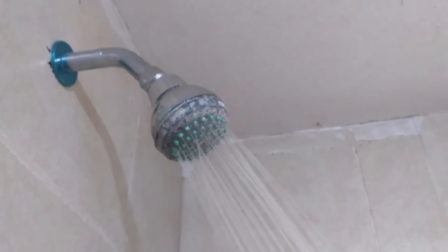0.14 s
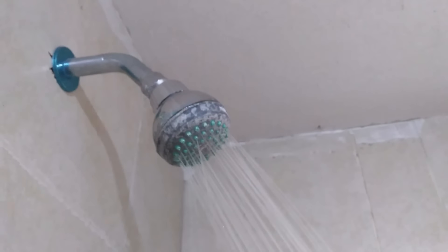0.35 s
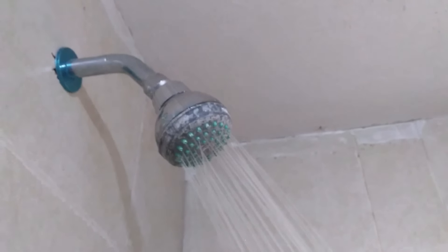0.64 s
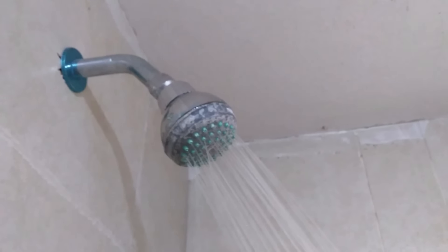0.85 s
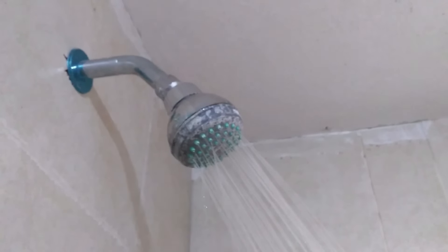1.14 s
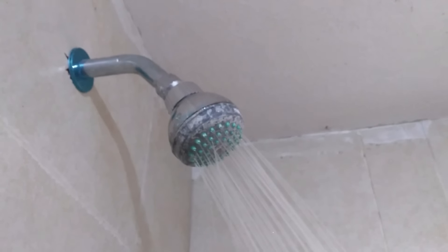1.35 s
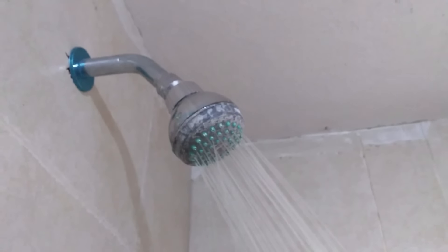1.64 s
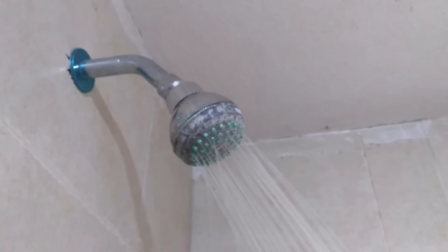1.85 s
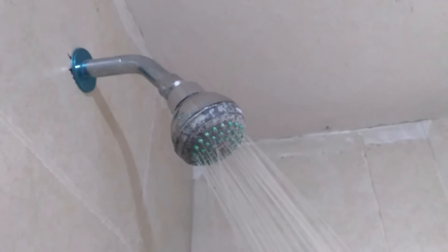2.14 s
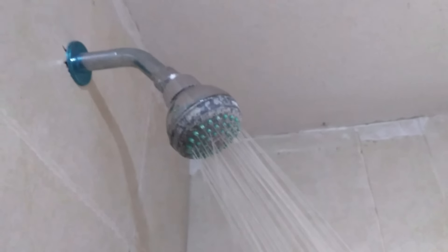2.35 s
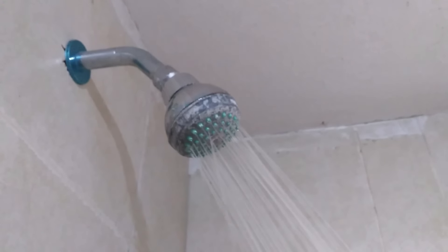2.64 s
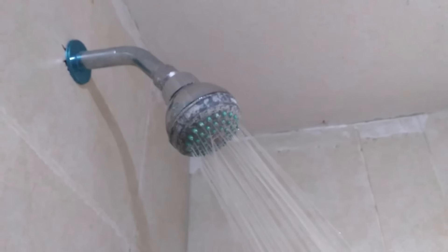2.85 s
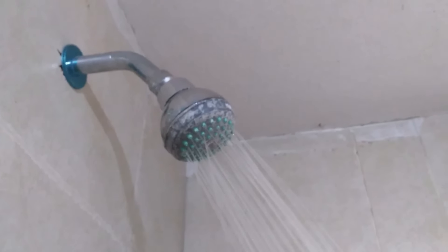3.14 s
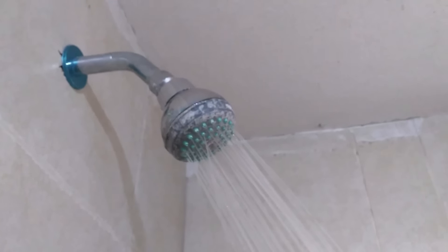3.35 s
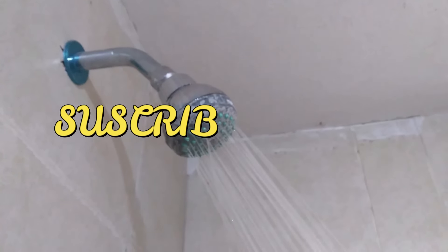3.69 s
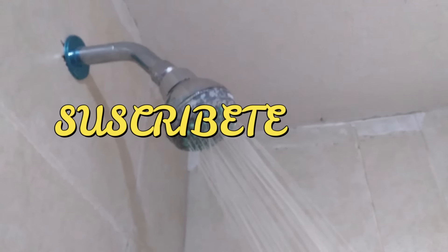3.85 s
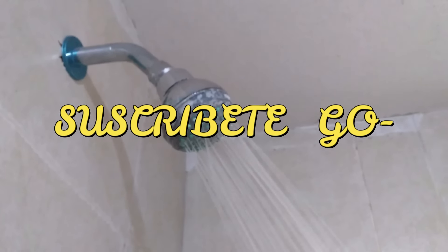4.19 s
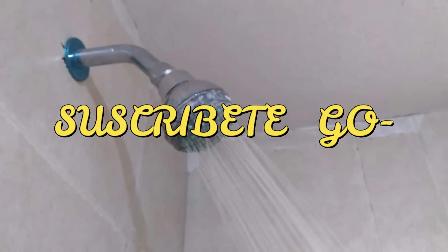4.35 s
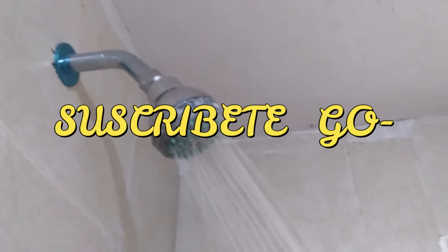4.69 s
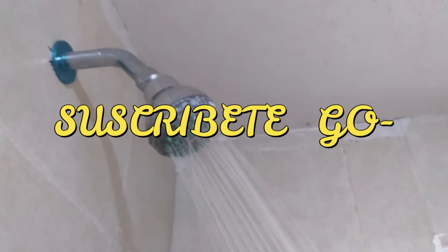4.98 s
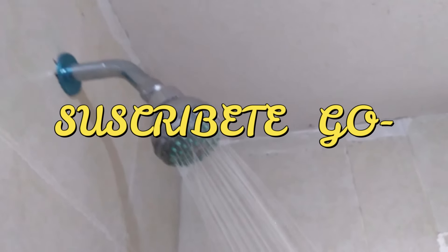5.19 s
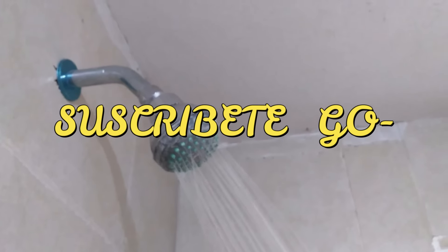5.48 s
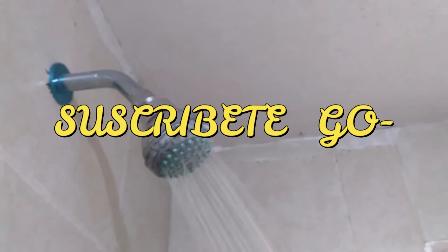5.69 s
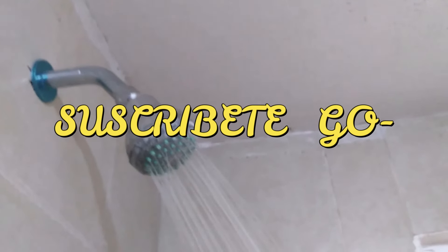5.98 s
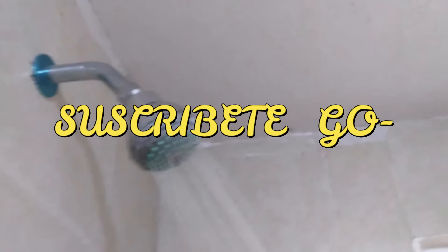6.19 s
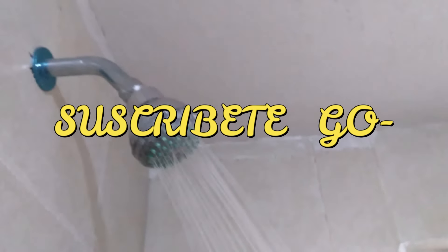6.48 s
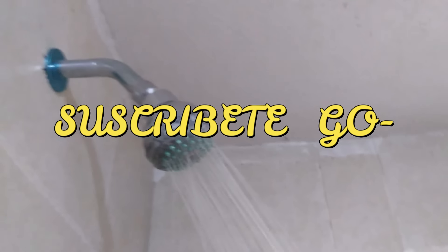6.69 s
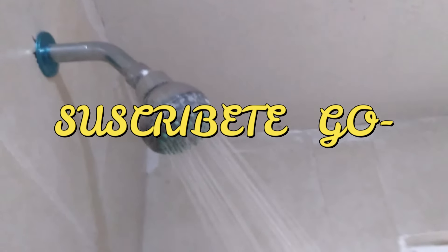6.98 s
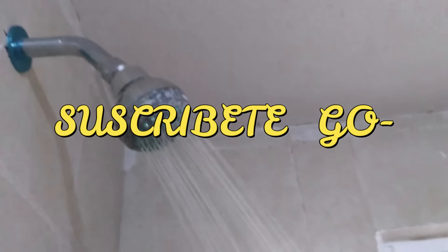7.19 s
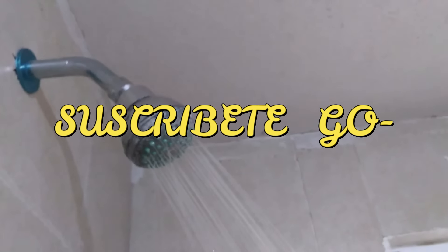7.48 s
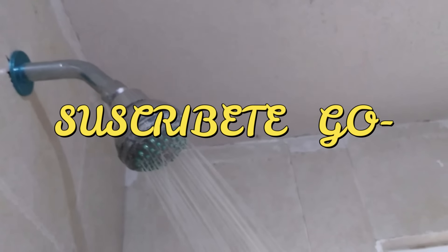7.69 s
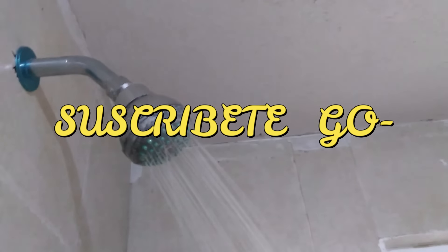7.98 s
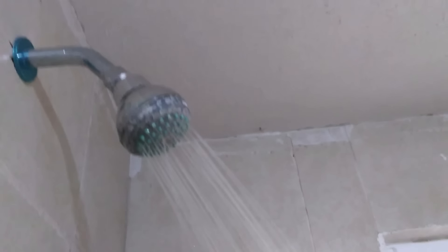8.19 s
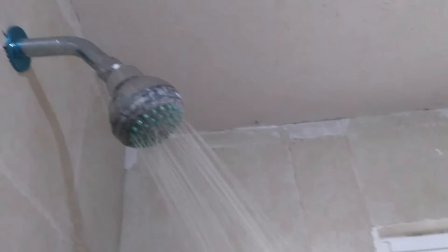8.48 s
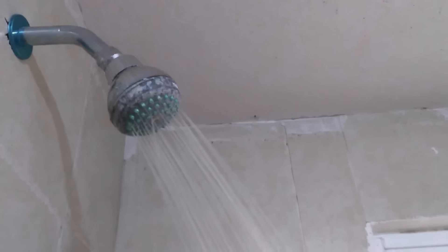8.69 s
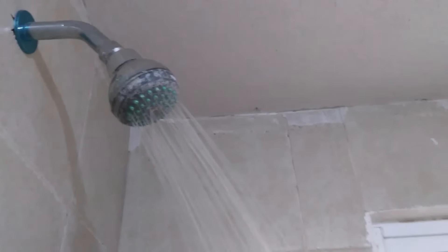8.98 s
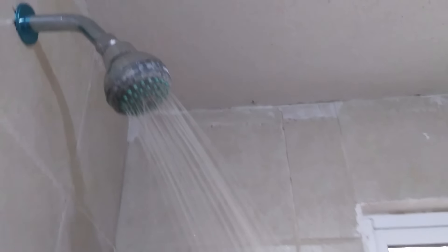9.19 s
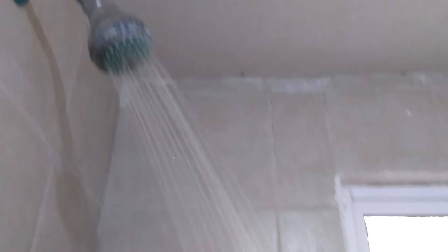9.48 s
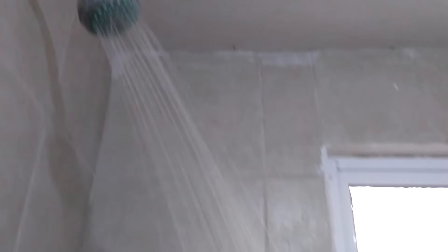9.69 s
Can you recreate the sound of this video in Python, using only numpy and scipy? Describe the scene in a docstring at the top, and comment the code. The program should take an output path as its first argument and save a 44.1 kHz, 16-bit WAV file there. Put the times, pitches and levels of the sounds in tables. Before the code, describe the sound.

Continuous water jets hiss and patter on a wet floor, with quick bubbling plips and brief spatters on tile. Hard walls add a short ring and soft, boxy low hums that swell irregularly. The first six seconds stay fairly even; then the flow sounds nearer and heavier, with low sloshes around eight seconds, and continues to the cut. Close, wide stereo handheld pickup.

```python
"""Shower in a small tiled bathroom

A hand-held device with two ports hears a shower at full flow. Shaped random spectra and short rings
make the spray's hiss and the floor's splatter; filtered noise makes the low roar and its surges.
Wandering tones hum at the stall's modes, noise bursts spatter, rising rings gurgle, and one drop ticks.
The device steers its ports apart by subtracting from each a delayed share of the other."""
import sys
import numpy as np
from scipy import signal
from scipy.fft import rfft, irfft
from scipy.io import wavfile
from scipy.ndimage import uniform_filter1d

SR = 44100
rng = np.random.default_rng(int(sys.argv[2]) if len(sys.argv) > 2 else 0)


def dump(signal):
    """Clip the signal to [-1, 1] and save it as 16-bit WAV at the path in sys.argv[1]."""
    limited = np.clip(np.atleast_2d(signal).T, -1, 1)
    pcm = np.round(limited * 32767).astype(np.int16)
    wavfile.write(sys.argv[1], SR, pcm)


N = 433944  # length in samples


def gain_of(db):
    """Level definition: 20 dB is a tenfold amplitude."""
    return 10 ** (np.asarray(db) / 20)


def evened(x):
    """Normalisation to unit root-mean-square amplitude."""
    return x / np.sqrt(np.mean(abs(x) ** 2) + 1e-20)


def read(points, hz):
    """Interpolation of a spectral curve along logarithmic frequency."""
    f, value = np.transpose(points)
    return np.interp(np.log(hz + 1), np.log(f + 1), value)


def level(rows, column):
    """Envelope: one column of levels, interpolated in dB, as a gain for every sample."""
    rows = np.array(rows)
    return gain_of(np.interp(np.arange(N) / SR, rows[:, 0], rows[:, column]))


def moments(rows, before_s, after_s):
    """Triangular envelope: each brief change ramps to its dB and back."""
    t = np.arange(N) / SR
    return gain_of(sum(np.interp(t, [s - before_s, s, s + after_s], [0, db, 0]) for s, db in rows))


WAVER_HZ = 9.0  # quickest random wavering of a layer


def wavering(depth_db):
    """Random modulation: sines of random phase, the slower ones stronger, sway the level in dB."""
    t = np.arange(0, N + 200, 100) / SR
    rates = np.geomspace(WAVER_HZ / 4, WAVER_HZ, 24)
    sway = sum(np.sin(2 * np.pi * (f * t + rng.random())) / np.sqrt(f) for f in rates)
    return gain_of(depth_db * np.interp(np.arange(N) / SR, t, evened(sway)))


def coloured(db):
    """Spectral shaping: steady noise, independent on the two sides, follows the level db."""
    return evened(irfft(rfft(rng.standard_normal((2, N))) * gain_of(db), N))


def band(x, low_hz, top_hz):
    """Band-pass filtering between two corner frequencies."""
    corners = [low_hz, min(top_hz, SR / 2.2)]
    return signal.sosfilt(signal.butter(3, corners, "bandpass", fs=SR, output="sos"), x)


def grains(low_hz, top_hz, cycles, per_s, spread_db, count):
    """Shot noise: sparse random trains of short rings with rising pitch, a few of them large."""
    struck = rng.random(N) < per_s / SR
    size = gain_of(spread_db * np.minimum(rng.exponential(1, N), 4)) * struck
    kind = rng.integers(0, 2 * count, N)
    t, out = np.arange(2000) / SR, np.zeros((2, N))
    for k, hz in enumerate(np.geomspace(low_hz, top_hz, 2 * count)):
        ring = np.exp(-t * hz / cycles) * np.sin(2 * np.pi * hz * t * (1 + 7.5 * t))
        ring /= np.linalg.norm(ring)
        out[k % 2] += signal.oaconvolve(size * (kind == k), ring)[:N]  # pitches alternate sides
    return evened(out)


def tiles(x, t60):
    """Reverberation: a dense decaying tail from the hard walls, unrelated on the two sides."""
    t = np.arange(20000) / SR
    tail = rng.standard_normal((2, len(t))) * gain_of(-60 * t / t60)
    return signal.oaconvolve(x, tail / np.linalg.norm(tail[0]), axes=1)[:, :N]


# turning from the head dulls the mist: t/s, slope/(dB per octave)
TURN = [(0, -1.5), (6.4, -2.5), (7, -7), (9.84, -7)]


def wash(spectrum, patchy_db, flicker_db, size, turn=False):
    """Short-time synthesis: random spectra with drifting patches and fading gusts common to all pitches."""
    frames, hz, hop_s = 4 * N // size + 5, np.fft.rfftfreq(size, 1 / SR), size / 4 / SR
    a, b, c, d, patches = rng.standard_normal((frames, len(hz), 5)).T
    patches = uniform_filter1d(patches, size=size // 64, axis=0)  # across frequency
    patches = evened(uniform_filter1d(patches, size=12, axis=1))  # across time
    starts = rng.random(frames) < 25 * hop_s  # 25 gusts per second on average
    gusts = signal.lfilter([1], [1, -np.exp(-hop_s / 0.016)], starts)
    db = spectrum(hz)[:, None] + patchy_db * patches + flicker_db * evened(gusts - gusts.mean())
    if turn:
        octaves = np.log2(np.maximum(hz / 4560, 1))  # above 4560 Hz
        db += np.outer(octaves, np.interp(np.arange(frames) * hop_s, *np.transpose(TURN)))
    z = np.array([a + 1j * b, c + 1j * d]) * gain_of(db)
    return evened(signal.istft(z, nperseg=size, noverlap=3 * size // 4)[1][:, :N])


# standing waves between the tiles: f/Hz, width/Hz, lift/dB
STALL = [(97.5, 5, 12), (145.6, 9, 11), (191, 6, 5), (286, 6, 11), (320, 4, 12), (340, 8, 6), (434, 4, 11),
         (510, 14, 4), (635, 60, 3), (766, 40, 3), (975, 70, 1), (1191, 22, 5), (1354, 60, 3),
         (1505, 18, 5), (1650, 50, 1)]


def standing(hz):
    """Modal resonance: lift in dB from the summed resonance curves of the stall."""
    power = sum(gain_of(db) ** 2 / (1 + (2 * (hz - f) / width) ** 2) for f, width, db in STALL)
    return 10 * np.log10(1 + power)


# levels of the water layers, mostly slow, with a sudden drop near 7.27 s
# (also used by splatter and drumming):
# t/s, spray hiss level/dB, floor splatter level/dB, low roar level/dB
FLOW = [(0, -46.5, -48, -48.5), (.9, -48, -49, -49), (1.4, -50.5, -48.5, -49), (1.7, -47.5, -49, -48),
        (2.15, -47.5, -47.5, -45.5), (2.55, -45.5, -51, -50), (3.3, -46, -47, -49),
        (4.5, -44.5, -47.5, -48), (5.1, -49, -50, -51.5), (5.5, -45, -46.5, -48),
        (6.55, -44.5, -45.5, -45.5), (6.75, -44, -47.5, -48), (7, -39, -42.5, -46.5),
        (7.255, -41.5, -43, -42.5), (7.28, -42, -47, -50), (7.6, -41, -48, -46), (8.06, -41.5, -44, -45),
        (8.6, -37.5, -38.5, -43), (9.1, -38, -38, -44), (9.84, -40, -40.5, -44.5)]
# relative spectral density of the hiss: f/Hz, level/dB
HISS = [(1500, -15.5), (3000, -41), (4500, -4), (6300, 0), (7100, 2), (9500, 2), (10000, 4.5),
        (14500, -1.5)]
# the jets spurt and the hiss jumps for a moment: t/s, lift/dB
SPURTS = [(.24, 7.5), (2.16, 5), (3.56, 3), (4.02, 4.5), (4.38, 3), (4.94, 2.5), (5.85, 3), (7.22, 5.5),
          (7.98, 5), (8.26, 5.5), (9.77, 5)]
SPURT_RISE_S, SPURT_FALL_S = 0.046, 0.071


def spray():
    """Jet atomisation: the jets tear into mist, and single droplets tick through its broadband hiss."""
    ticks = grains(3000, 10400, 0.56, 1500, 4.7, count=8)
    hiss = wash(lambda hz: read(HISS, hz), 2.0, 0.69, size=256, turn=True)
    mist = hiss + gain_of(-12.5) * ticks + gain_of(-13.5) * tiles(ticks, 0.028)
    spurting = moments(SPURTS, SPURT_RISE_S, SPURT_FALL_S)
    return level(FLOW, 1) * spurting * wavering(0.89) * mist


# relative spectral density of the splatter before the modal lift: f/Hz, level/dB
SPLATTER = [(600, -29), (870, -10.5), (1200, -10), (1750, 0.5), (2300, -1), (3100, -7.5), (4500, -5.5),
            (9000, -22)]


def splatter():
    """Impact and bubble radiation: water lands on the wet floor in a wash full of small bubbles."""
    bubbles = grains(914.5, 2944, 6.7, 300, 3.0, count=14)
    slaps = grains(1880, 2990, 2.8, 34, 1.2, count=3)  # fat drops hit bare tile with a dry click
    body = wash(lambda hz: read(SPLATTER, hz) + standing(hz), 2.47, 0.74, size=1024)
    body = body + gain_of(-16.5) * slaps + gain_of(-17) * bubbles
    return level(FLOW, 2) * wavering(1.0) * (body + gain_of(-7.5) * tiles(bubbles, 0.13))


# relative spectral density of the roar before the modal lift: f/Hz, level/dB
DRUMMING = [(25, -46), (50, -22), (120, 0), (250, -4), (400, -1), (640, 1.5), (760, -2), (870, -13),
            (1300, -16)]
# deepest part of the roar, before a common 4 dB lift: t/s, level/dB
DEEP = [(0.0, -63.5), (.9, -71.5), (2.19, -67), (2.6, -62), (2.9, -63), (3.42, -63), (4.77, -65),
        (8.0, -62), (8.22, -59.5), (9.59, -62), (9.84, -61)]
DEEP_HZ = 170  # crossover to the deepest part
# surges, as of a slosh on the floor: t/s, rise/s, length/s, level/dB, low f/Hz, top f/Hz
SURGES = [(0, .1, .45, -55, 260, 310), (0.137, .02, 0.27, -54, 504, 790),
          (4.782, 0.022, 0.22, -49, 316, 1020), (5.336, .006, 0.19, -45, 550, 1700),
          (6.452, .03, 0.088, -53, 800, 1130), (7.635, 0.019, 0.12, -41, 454, 1210),
          (7.874, .008, 0.084, -44, 500, 1500), (7.655, .015, 0.11, -41.5, 100, 258),
          (8.137, 0.04, .14, -36, 109, 395), (8.138, 0.057, 0.27, -37, 295, 1400),
          (8.226, 0.056, 0.19, -34.5, 160, 494)]


def drumming():
    """Modal amplification: standing waves lift the low roar of the falling water and its surges."""
    hz = np.fft.rfftfreq(N, 1 / SR)
    lift_db = standing(hz)
    deep_share = 1 / (1 + (hz / DEEP_HZ) ** 12)  # of the power
    db = read(DRUMMING, hz) + lift_db
    roar = coloured(db + 10 * np.log10(1.00001 - deep_share))
    out = level(FLOW, 3) * wavering(1.05) * wavering(0.45) * roar
    out += level(DEEP, 1) * gain_of(4) * coloured(db + 10 * np.log10(deep_share))
    slosh = coloured(lift_db)
    for s, rise, length, surge_db, low_hz, top_hz in SURGES:
        at, t = round(s * SR), np.arange(0, length, 1 / SR)
        part = evened(band(slosh[:, at:at + len(t)], low_hz, top_hz))
        out[:, at:at + len(t)] += gain_of(surge_db) * np.interp(t, [0, rise, length], [0, 1, 0]) * part
    return out


# levels of three low hums that swell and fade irregularly:
# t/s, upper hum level/dB, lowest hum level/dB, middle hum level/dB
HUM = [(0, -52.5, -67, -57), (.45, -59.5, -71, -66), (.95, -53, -72, -60), (1.85, -65, -76, -65),
       (2.14, -48, -68, -65), (2.6, -58.5, -63, -55), (3.5, -51.5, -52, -57), (3.78, -61, -63, -59),
       (4, -39.5, -56, -58), (4.2, -58, -59, -60), (4.6, -49, -56, -65), (5.3, -53, -63, -64),
       (5.6, -50, -51.5, -58), (6.6, -50.5, -58, -61), (6.85, -63, -62, -58), (7.07, -43.5, -58, -59),
       (7.43, -56.5, -63, -57), (7.62, -45, -52, -61), (7.72, -36, -41.5, -49), (7.84, -48, -49, -60),
       (7.97, -49, -63, -57), (8.1, -47.5, -58, -61), (8.17, -45, -58, -45), (8.23, -46, -56, -40),
       (8.29, -31, -50, -28), (8.35, -36, -44, -45), (8.47, -44, -61, -56), (8.8, -44, -57, -55),
       (9.06, -38.5, -49, -53), (9.27, -44.5, -58, -58), (9.6, -52.5, -56, -61), (9.84, -44, -58, -59)]
# the three strongest standing waves, in the same order: f/Hz, width/Hz
HUM_MODES = [(214.3, 2.5), (72.5, 6), (145.6, 4)]


def hum():
    """Narrow-band resonance: each tone's phase walks at random by its mode's width; its level flutters."""
    out, t = np.zeros(N), np.arange(N) / SR
    for k, (hz, width) in enumerate(HUM_MODES):
        wander, flutter = rng.standard_normal((2, N))
        wander = np.cumsum(wander) * np.sqrt(2 * np.pi * width / SR)
        wander = uniform_filter1d(wander, size=1500)
        flutter = evened(uniform_filter1d(uniform_filter1d(flutter, size=3000), size=3000))
        tone = np.sin(2 * np.pi * hz * t + wander)
        out += level(HUM, k + 1) * gain_of(2.1 * flutter) * tone
    return np.array([out, gain_of(-18.5) * np.roll(out, N // 3)])  # the shift unties the second side


# sharpest spatters of spray on the near tiles: t/s, relative level/dB, centre f/Hz
SPATTERS = [(0.2039, -28, 7290), (0.6769, -32, 7520), (1.079, -33, 3710), (1.6372, -37, 3030),
            (1.8961, -26, 5380), (2.149, -25, 8320), (2.9871, -32, 5120), (3.271, -35, 2730),
            (3.5234, -28, 3010), (4.7744, -36, 3010), (4.9327, -39, 3230), (5.1974, -42, 3190),
            (5.3464, -36, 4830), (5.444, -30, 2720), (5.4574, -32, 3100), (5.731, -27, 4840),
            (5.9609, -33, 3190), (6.957, -23, 5050), (7.214, -21, 4600), (7.5807, -33, 7300),
            (8.1464, -23, 5070), (8.3744, -33, 2660)]
SPATTER_S, SPATTER_OCTAVES = 0.016, 0.39  # decay time, half bandwidth


def spatters():
    """Impulsive noise: a clump of droplets bursts on tile in a bright puff that dies at once."""
    out, t = np.zeros((2, N + 4000)), np.arange(4000) / SR
    puffs = rng.standard_normal((len(SPATTERS), 2, 4000))
    for (s, db, hz), puff in zip(SPATTERS, puffs):
        puff = evened(band(puff, hz / 2 ** SPATTER_OCTAVES, hz * 2 ** SPATTER_OCTAVES))
        out[:, round(s * SR):][:, :4000] += gain_of(db - 13.5) * np.exp(-t / SPATTER_S) * puff
    return out[:, :N]


def bubble(hz, t60, rise):
    """Bubble resonance: trapped air rings, its pitch climbing as it nears the surface."""
    t = np.arange(4000) / SR
    envelope = (1 - np.exp(-t / 0.0022)) * gain_of(-60 * t / t60)
    return envelope * np.sin(2 * np.pi * hz * t * (1 + rise * t))


# loudest gurgles of trapped air where jets strike the pool: t/s, relative level/dB, starting f/Hz
GURGLES = [(0.257, -18.5, 1600), (0.285, -26, 1350), (0.39, -33, 1510), (0.473, -29, 1220),
           (0.53, -29, 2420), (0.847, -28, 1260), (1.059, -28, 1570), (1.44, -25.5, 1550),
           (2.02, -23, 2510), (2.095, -20.5, 2220), (2.361, -27, 1250), (2.477, -24, 1950),
           (2.781, -31, 1360), (3.071, -29, 1280), (3.06, -30, 2030), (3.447, -25, 1210),
           (3.516, -28, 2560), (3.718, -28, 1500), (3.765, -25, 1440), (3.873, -17, 2100),
           (3.898, -22, 2420), (4.08, -24, 2390), (4.099, -27, 1000), (4.21, -25, 1540), (4.456, -23, 2360),
           (4.717, -26, 1270), (4.799, -27, 1430), (5.336, -32, 1240), (5.47, -21, 1920),
           (5.746, -27, 2400), (5.884, -20, 2240), (5.991, -25, 990), (6.19, -27, 1340), (6.33, -26, 960),
           (6.482, -31, 950), (6.582, -25, 1350), (7.0, -28.5, 1000), (7.113, -23, 1900),
           (7.141, -26, 1340), (7.183, -23, 2480), (7.351, -28, 960), (8.251, -25.5, 1220),
           (8.313, -27, 1170), (8.48, -24, 2400), (8.86, -19.5, 1160), (8.892, -29, 1190),
           (8.998, -28, 1350), (9.035, -20, 1480), (9.193, -33, 1310), (9.424, -30, 1480),
           (9.782, -22, 1370)]


def gurgles():
    """Bubble clustering: larger bubbles come in quick groups of five, with their ring off the tiles."""
    out = np.zeros((2, N + 8000))
    chance = rng.random((len(GURGLES), 5, 3))
    for (s, db, hz), cluster in zip(GURGLES, chance):
        for k, (late, detune, side) in enumerate(cluster):
            at = round((s + 0.014 * k * late) * SR)
            ring = bubble(hz * (1 + 0.084 * k * (detune - 0.6)), 0.018, 1.8)
            out[:, at:at + 4000] += np.outer([1, side], gain_of(db - 1.8 * k) * ring)
    out = out[:, :N]
    return gain_of(-6.5) * out + gain_of(-5.5) * tiles(out, 0.31)


# one drop strikes the device by its right port: t/s, level/dB, tick f/Hz
SMACK = [(6.6922, -17, 2700)]


def smack():
    """Structure-borne impact: a brief tick and a dull push through the case."""
    out, t = np.zeros((2, N)), np.arange(600) / SR
    for s, db, hz in SMACK:
        late = t - 0.0004
        tick = np.exp(-(late / 0.00021) ** 2) * np.cos(2 * np.pi * hz * late)
        push = -0.7 * np.sin(2 * np.pi * 800 * t) * np.exp(-t / 0.00081)
        out[:, round(s * SR):][:, :600] += np.outer([0.2, 1], gain_of(db) * (tick + push))
    return out


# likeness of the sound at the two ports: f/Hz, likeness (0 to 1)
ALIKE = [(30, .3), (60, 1), (100, 0.17), (145, 0.87), (214, 0.91), (300, 0.73), (600, 0.67), (1200, 0.016),
         (3000, 0.019), (14000, 0.039)]
# the body shades the right port: f/Hz, left-over-right level/dB
SHADE = [(100, -2.5), (1500, 5), (3200, 3), (6000, 2.5), (10000, 7), (14000, 8.5)]


def ports(a, b):
    """Spatial coherence: the ports' likeness varies with frequency, and the body shades the right one."""
    hz = np.fft.rfftfreq(N, 1 / SR)
    same = np.clip(read(ALIKE, hz), 0, 1)
    a, b = rfft(a), rfft(b)
    shade = gain_of(read(SHADE, hz) / 2)  # half on each side
    right = same * a + np.sqrt(1 - same ** 2) * b
    return irfft(np.array([a * shade, right / shade]), N)


# the spray, splatter and roar sink for a moment and come back quickly: t/s, change/dB
LULLS = [(.12, -0.5), (.46, -3), (1.13, -2.5), (1.34, -2.5), (1.58, -2), (2.9, -2), (3.18, -3),
         (4.65, -4.5), (6.87, -3), (8.92, -3)]
LULL_SINK_S, LULL_BACK_S = 0.085, 0.095


def scene():
    """Superposition: all sources add at the ports, the drop directly on the device."""
    water = moments(LULLS, LULL_SINK_S, LULL_BACK_S) * (spray() + splatter() + drumming())
    left, right = water + hum() + spatters() + gurgles()
    return ports(left, right) + smack()


# share of the opposite port, before its cap and the slow gain: f/Hz, share (0 to 1)
CROSS = [(50, 0.61), (1000, 0.56), (2200, 0.59), (4200, 0.63), (5300, 0.37), (7500, 0.017), (11000, 0.0069)]
CROSS_S, MOST_CROSS = 0.0004749, 0.84  # delay of the share in s, its cap
# slow curve of the gain on the subtracted share, with random wavering added: t/s, gain/dB
STEER = [(0, 2), (1.3, 1.5), (2.5, 5.5), (3.8, 1.5), (6.2, 3), (7, -1), (7.6, 2.5), (8.8, -0.5), (9.84, 2)]
EDGE_HZ = 14280  # upper band limit


def record(dry):
    """Delay-and-subtract directivity: each side loses a share of the other; then the band limit."""
    hz = np.fft.rfftfreq(N, 1 / SR)
    share = np.minimum(read(CROSS, hz), MOST_CROSS)
    delay = np.exp(-2j * np.pi * hz * CROSS_S)
    opposite = irfft(share * delay * rfft(dry[::-1]), N)
    share_gain = np.minimum(level(STEER, 1) * wavering(1.5), 1.15)
    steered = dry - share_gain * opposite
    lowpass = signal.firwin(1023, EDGE_HZ, window=("kaiser", 10), fs=SR)
    return signal.oaconvolve(steered, lowpass[None], "same")


dry = scene()
out = record(dry)
dump(out)
```